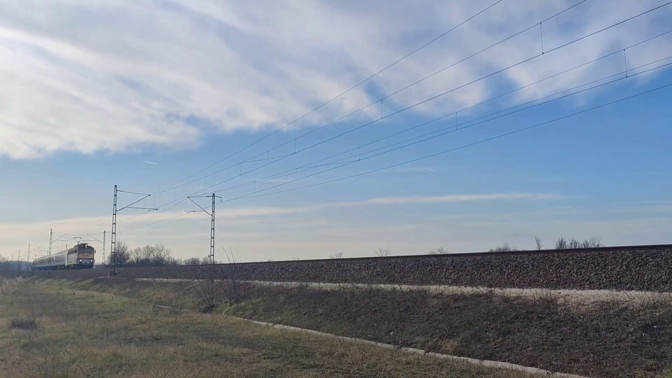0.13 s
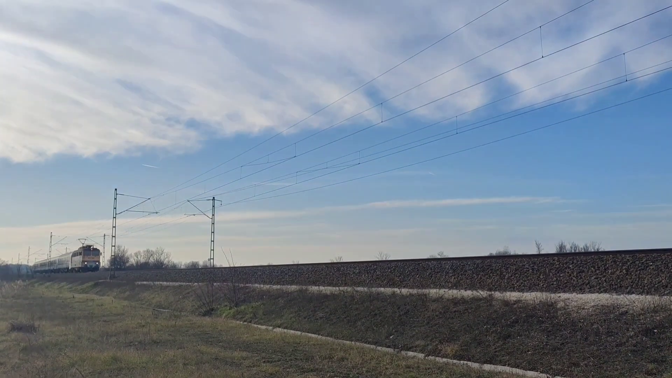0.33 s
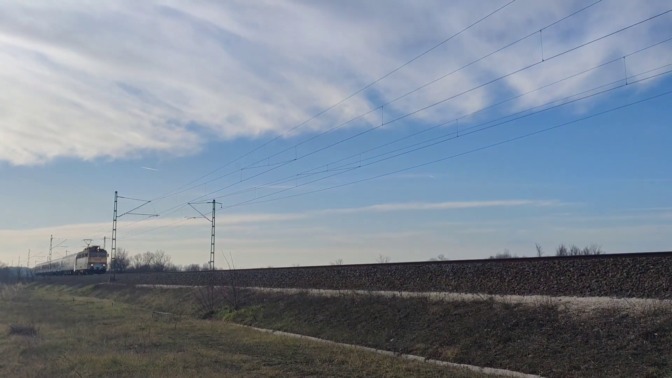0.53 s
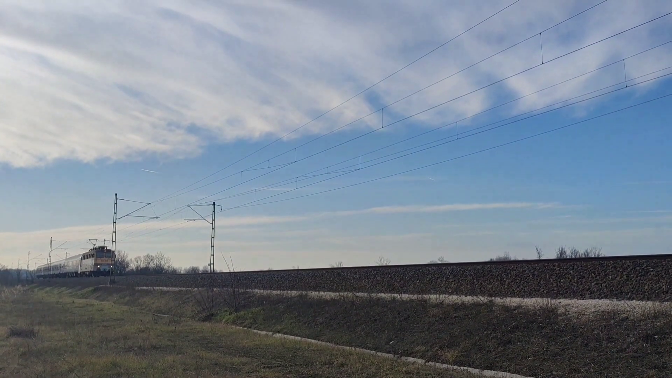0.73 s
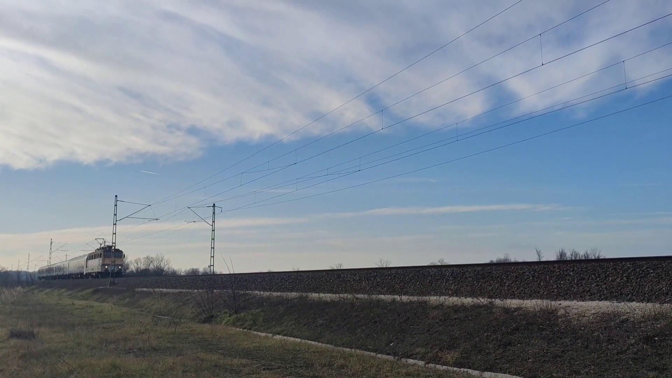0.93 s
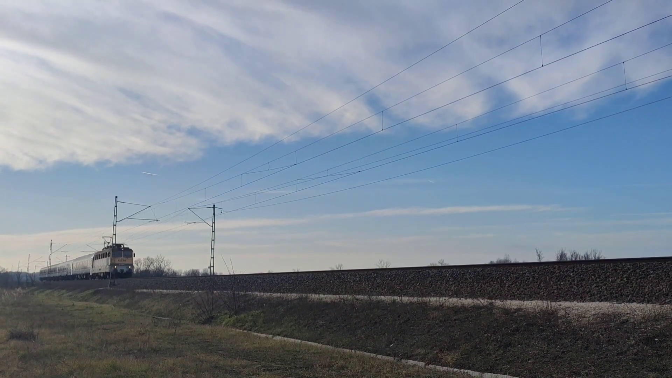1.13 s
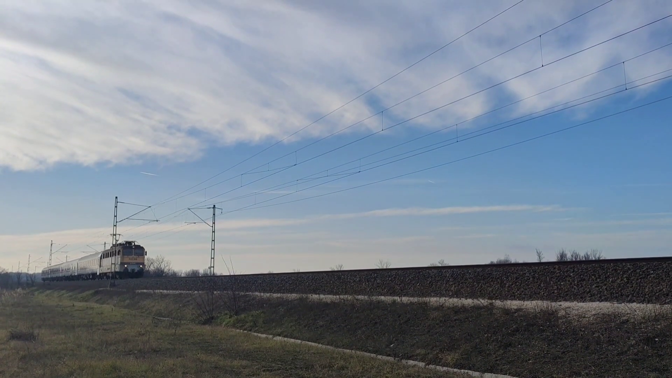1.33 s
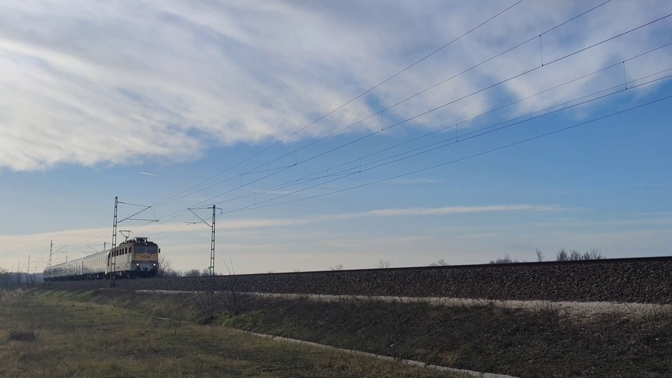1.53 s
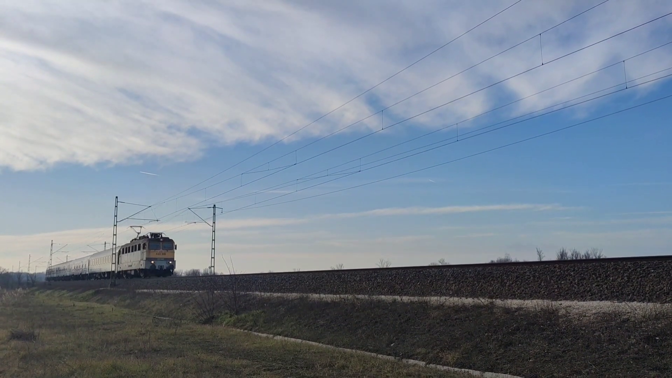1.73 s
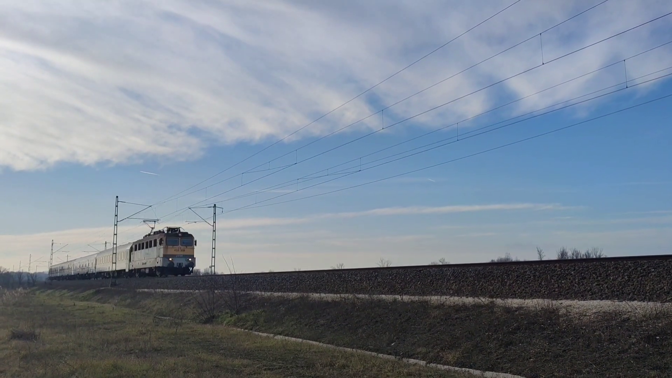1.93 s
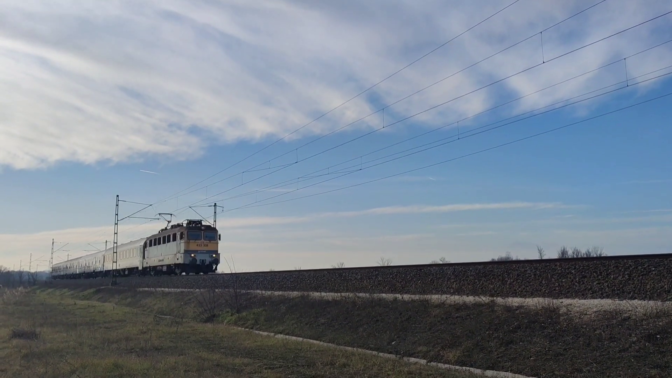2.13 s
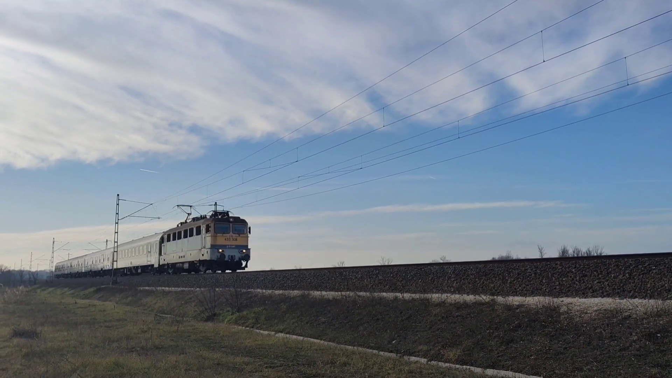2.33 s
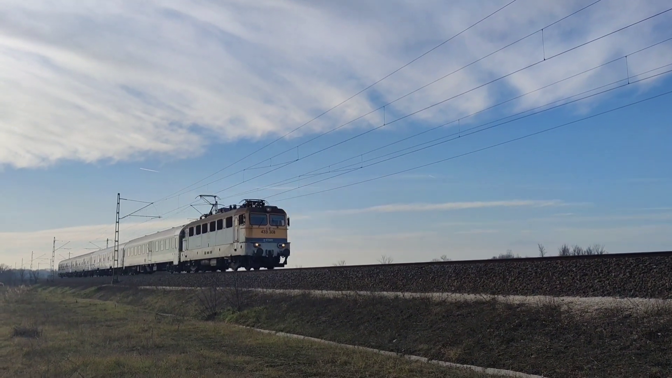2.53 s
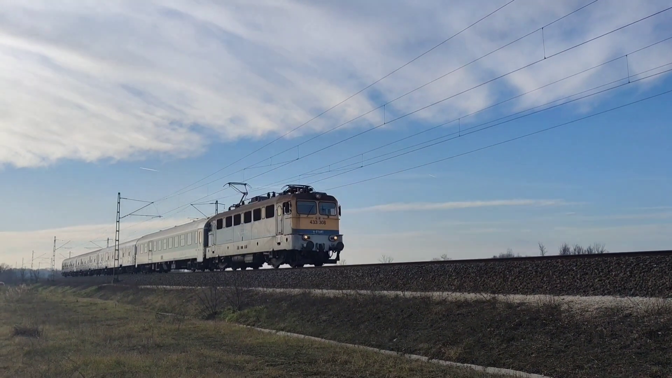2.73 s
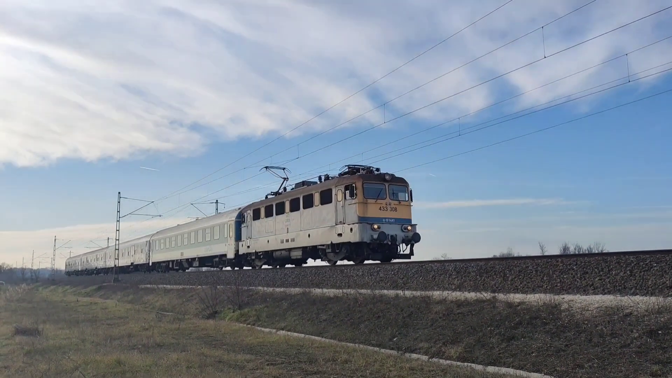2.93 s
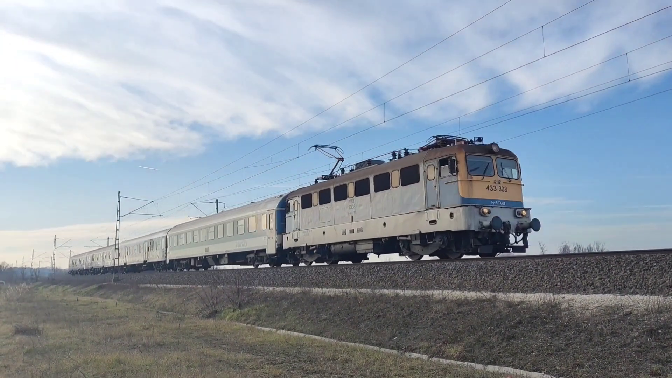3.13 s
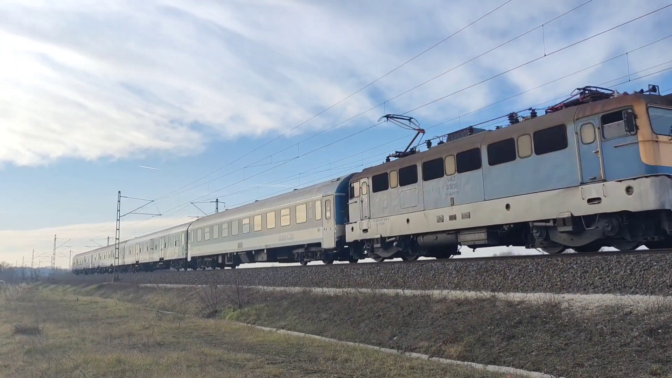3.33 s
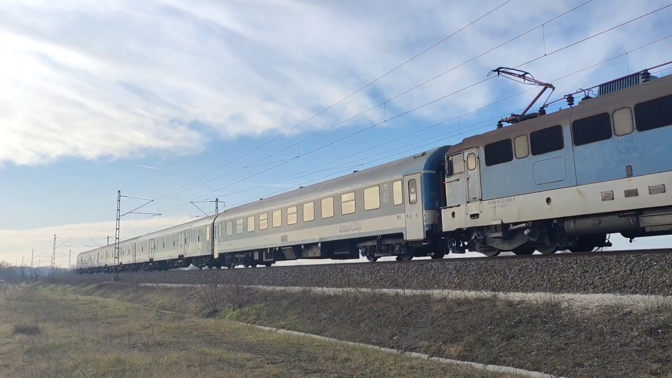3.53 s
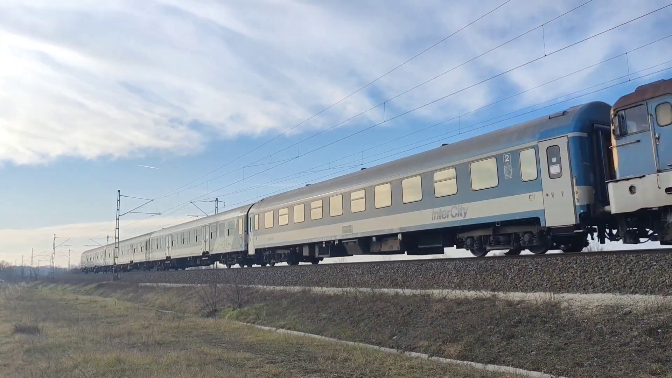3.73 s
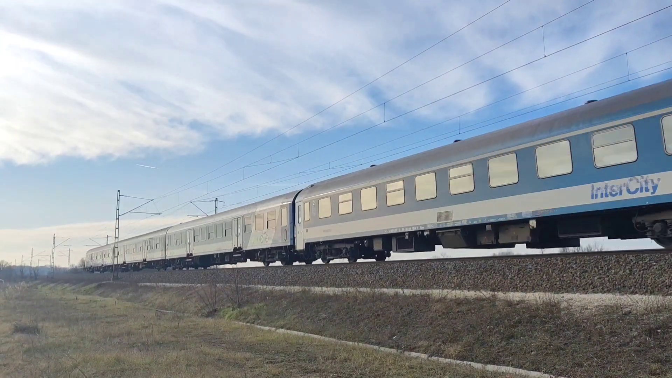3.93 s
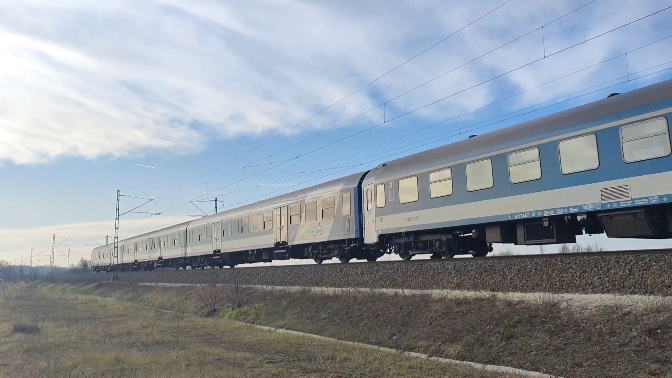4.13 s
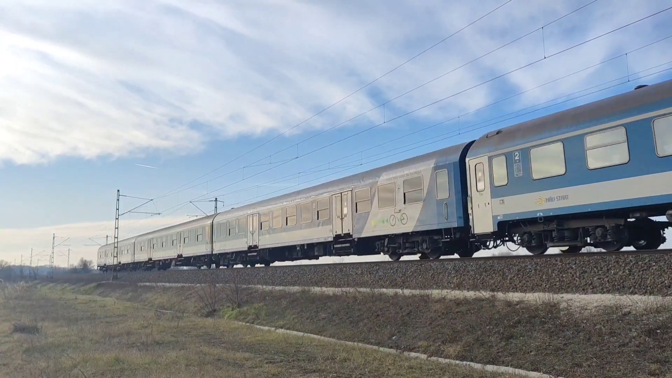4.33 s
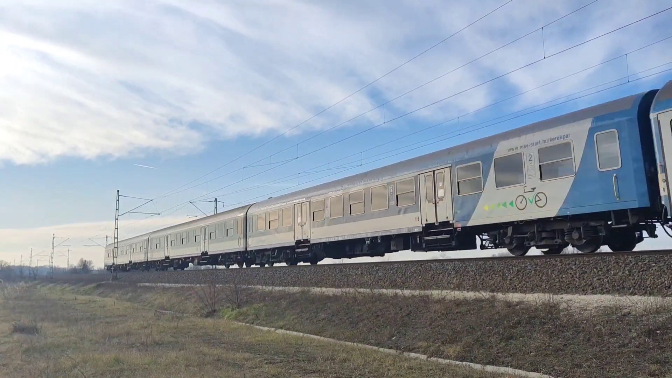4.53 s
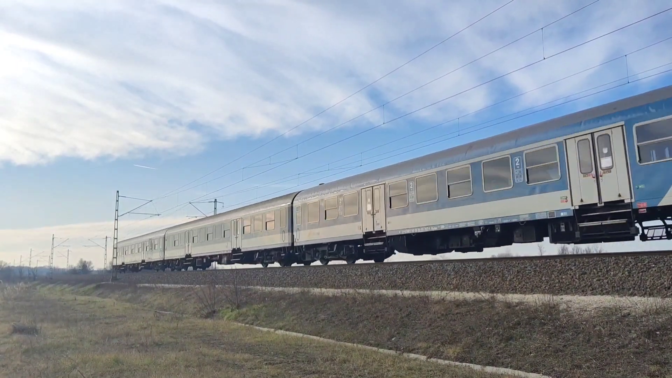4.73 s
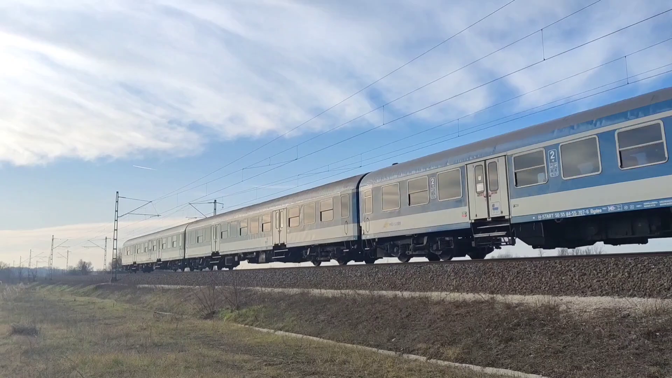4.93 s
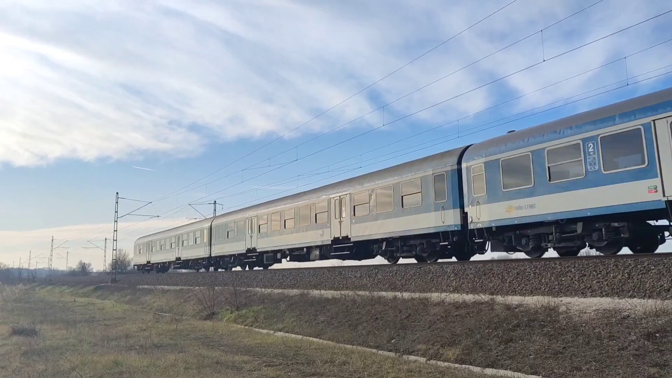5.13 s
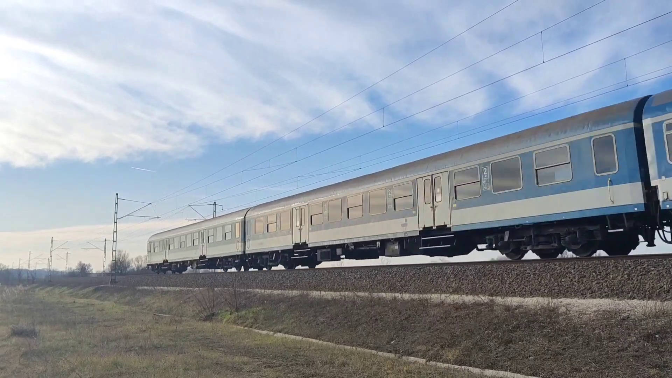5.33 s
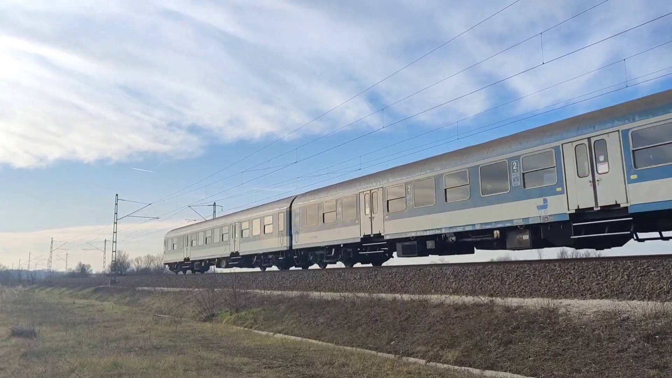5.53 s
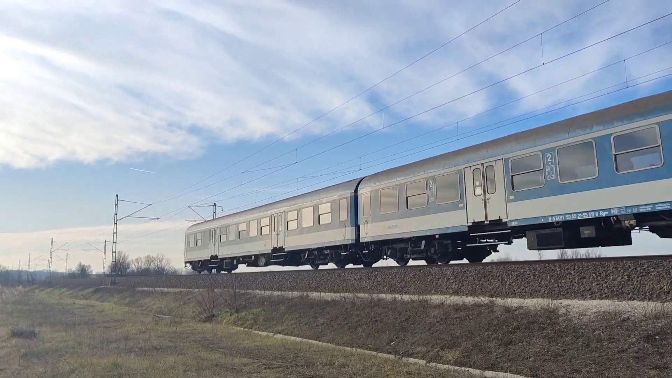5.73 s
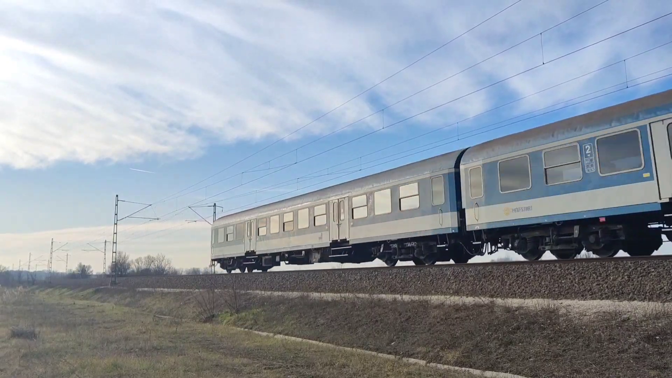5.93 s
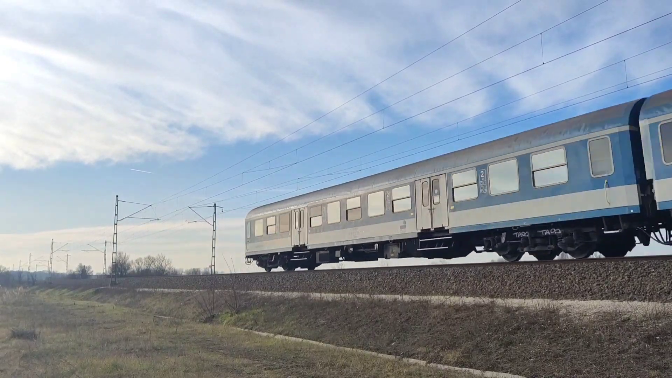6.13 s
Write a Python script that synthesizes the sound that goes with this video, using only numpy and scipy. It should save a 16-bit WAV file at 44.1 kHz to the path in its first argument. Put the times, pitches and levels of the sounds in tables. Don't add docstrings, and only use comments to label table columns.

```python
import sys
import numpy as np
from scipy import signal
from scipy.io import wavfile
from scipy.ndimage import uniform_filter1d

SR = 44100
rng = np.random.default_rng(int(sys.argv[2]) if len(sys.argv) > 2 else 0)


def ratio_of_db(decibels):
    return 10 ** (np.asarray(decibels, float) / 20)


def master_out(mix):
    frames = np.transpose(np.atleast_2d(mix))
    ceiling = np.clip(frames, -1, 1)
    pcm = np.round(ceiling * 32767).astype(np.int16)
    wavfile.write(sys.argv[1], SR, pcm)


N = 276504

FRAME, HOP = 1024, 256
HZ = np.fft.rfftfreq(FRAME, 1 / SR)
TIMES_S = np.arange(N // HOP + 2) * HOP / SR
SPEED_M_S, TRACK_M, SOUND_M_S = 32.1, 11.6, 343
MOTOR_ABREAST_S = 3.975
HANDOVER_S = 3.355

# [f/Hz, left lead/rad, likeness 0-1]
PORTS_FAR = [(40, 0, .99), (1180, .4, .7), (1320, 3, .55), (1750, .1, .93), (2200, .2, .8), (2300, 2.2, .7),
             (2880, .7, .8), (2950, 3.5, .8), (3300, 2.8, .9), (4000, -2.1, .72), (5050, -2.4, .65),
             (5700, -6.3, .78), (6150, -6.8, .3), (8000, -11, .1)]
# [f/Hz, left lead/rad, likeness 0-1]
PORTS_NEAR = [(40, 0, .995), (300, -.4, .97), (600, -1.6, .8), (900, -1.7, .72), (1250, -3.1, .8),
              (1600, -4, .82), (2000, -7.4, .55), (2250, -6.2, .68), (2700, -7.2, .6), (3000, -9.3, .4),
              (3300, -9.4, .15), (8000, -12, .1)]


def evened(x):
    return x / np.sqrt(np.mean(abs(x) ** 2))


def read(table, hz):
    f, *columns = np.transpose(table)
    return np.array([np.interp(np.log(hz + 1), np.log(f + 1), c) for c in columns])


def bell(x, centre, width):
    return np.exp(-2 * ((x - centre) / width) ** 2)


def dips_db(table):
    return sum(db * bell(HZ, hz, width_hz) for hz, width_hz, db in table)


def swells_db(table):
    return sum(np.outer(db, bell(TIMES_S, s, length_s)) for s, length_s, *db in table)


def distance_db(abreast_s, db_per_decade):
    distance_m = np.hypot(SPEED_M_S * (abreast_s - TIMES_S), TRACK_M)
    return -db_per_decade * np.log10(distance_m / TRACK_M)


def bearing_rad():
    return np.arctan2(TRACK_M, SPEED_M_S * (MOTOR_ABREAST_S - TIMES_S))


def resonate(x, hz, width_hz):
    turn = np.exp(2j * np.pi * np.cumsum(hz) / SR)
    r = np.exp(-np.pi * width_hz / SR)
    return turn * signal.lfilter([(1 - r) ** 2], [1, -2 * r, r * r], x / turn)


def roar(level, lead_rad, same, patchy_db):
    a, b, c, d, streaks = rng.standard_normal((len(TIMES_S), len(HZ), 5)).T
    for _ in range(2):
        streaks = uniform_filter1d(streaks, size=3, axis=0)
        streaks = uniform_filter1d(streaks, size=14, axis=1)
    flicker = evened(uniform_filter1d(rng.standard_normal(len(TIMES_S)), size=3))
    texture_db = patchy_db * evened(streaks) * np.minimum(HZ / 700, 1)[:, None]
    texture_db = texture_db + np.outer(0.45 + HZ / 90000, flicker)
    same = np.clip(same, 0, 1)
    right = a + 1j * b
    left = same * right * np.exp(1j * lead_rad) + np.sqrt(1 - same ** 2) * (c + 1j * d)
    return np.array([left, right]) * level * ratio_of_db(texture_db) / np.sqrt(2)


def self_noise():
    # [f/Hz, level/dB]
    hiss = [(40, -96), (4000, -101), (9000, -97), (15600, -100)]
    return roar(ratio_of_db(read(hiss, HZ).T + 0 * TIMES_S), 0, 0, .5)


def far_level_db():
    # [t/s, length/s, lift/dB]
    rough_rail = [
        (1.75, 0.26, 1.5),
        (2.15, 0.12, 2),
        (3.1, .15, 0.5),
    ]
    abreast_db, db_per_decade, fade_db_per_s = -22, 26.5, 52
    fade_db = fade_db_per_s * np.maximum(TIMES_S - HANDOVER_S, 0)
    return abreast_db + swells_db(rough_rail)[0] + distance_db(MOTOR_ABREAST_S, db_per_decade) - fade_db


def far_train():
    # [f/Hz, left/dB per Hz, right/dB per Hz]
    far_roll = [(40, -3.2, 1.5), (174, -1, -1.5), (327, -12, -11.5), (510, -22, -22.5), (750, -12.5, -12),
                (1890, -12, -13), (2780, -16, -4.5), (3240, -18.5, -13.5), (5780, -29, -16.5),
                (6280, -47, -22), (7290, -47, -32.5), (8200, -44.5, -45.5), (11500, -59, -45),
                (15600, -62, -56)]
    # [f/Hz, width/Hz, gain/dB]
    left_dips = [(570, 120, -3), (1150, 160, -6), (1560, 150, -7), (2240, 250, -13), (2910, 150, -12),
                 (3740, 380, -7), (5270, 300, -8)]
    # [f/Hz, width/Hz, gain/dB]
    right_dips = [(560, 120, -3), (1570, 210, -12), (2420, 350, -8)]
    cuts_db = np.array([dips_db(left_dips), dips_db(right_dips)])
    lead, same = read(PORTS_FAR, HZ)[:, :, None]
    bearing = bearing_rad()
    lead = lead - 5.5 * (bearing - .15) * np.minimum(HZ / 900, 1)[:, None]
    same = same * ratio_of_db(0.18 * cuts_db[0])[:, None]
    filled_db = cuts_db[:, :, None] * np.clip(1.15 - .8 * bearing, 0, 1.5)
    power = ratio_of_db(read(far_roll, HZ)[:, :, None] + filled_db + far_level_db()) ** 2
    return power, lead, same


def ground_sweep():
    # [t/s, f/Hz, level/dB]
    sweep = [
        (3.5, 378, -45),
        (3.6, 347, -27),
        (3.75, 270.4, -40),
        (4.0, 220.5, -30),
        (4.15, 203, -34.5),
        (4.25, 205, -56),
    ]
    t = np.arange(N) / SR
    s, hz, db = np.transpose(sweep)
    on = (t > s[0]) & (t < s[-1])
    band = resonate(rng.standard_normal(N), np.interp(t, s, hz), 14.0).real
    return evened(band) * ratio_of_db(np.interp(t, s, db)) * on


def coach_power():
    # [abreast/s, level/dB]
    joints = [
        (4.13, -40.5),
        (4.8, -42),
        (5.62, -26),
        (6.2, -25.5),
    ]
    # [t/s, length/s, lift/dB]
    axle_surges = [
        (5.35, 0.11, -0.5),
        (5.7, 0.1, 0.5),
        (5.81, 0.047, -1.5),
        (5.875, 0.052, 1),
        (6.05, 0.034, -0.5),
        (6.26, .05, 1.5),
    ]
    clear = np.clip((TIMES_S - 3.99) / 0.091, 0, 1)
    groups = sum(ratio_of_db(db + distance_db(s, 23)) ** 2 for s, db in joints)
    return clear * ratio_of_db(swells_db(axle_surges)[0]) ** 2 * groups


def engine_power():
    abreast_s, abreast_db, db_per_decade, emerge_db_per_s = 3.823, -28.5, 21.5, 19.5
    hidden_db = emerge_db_per_s * np.maximum(HANDOVER_S - TIMES_S, 0)
    return ratio_of_db(abreast_db + distance_db(abreast_s, db_per_decade) - hidden_db) ** 2


def engine_dips():
    # [f far off/Hz, width/Hz, gain/dB]
    ground_dips = [(540, 58, -4.5), (1560, 300, -5.5), (2350, 260, -7.5)]
    sink_per_rad, fill_per_rad = 0.12, 0.62
    bearing = bearing_rad()
    depth = np.clip(1.3 - fill_per_rad * bearing, 0, 1)
    sink = 1 - sink_per_rad * bearing
    cuts_db = sum(db * bell(HZ[:, None], hz * sink, width_hz) for hz, width_hz, db in ground_dips)
    return ratio_of_db(depth * cuts_db) ** 2


def near_train(spectrum, power):
    return power * ratio_of_db(read(spectrum, HZ)[:, :, None]) ** 2


def bogie_shelves():
    # [t/s, length/s, lift/dB]
    thumps = [
        (0.55, 0.18, 0),
        (1.05, .15, 0),
        (2.95, 0.18, 0.5),
        (3.6, 0.1, 3),
        (4.3, .25, 2.5),
        (4.85, 0.81, 2.5),
        (5.6, 0.13, -1),
    ]
    # [t/s, length/s, left/dB, right/dB]
    fizz_swells = [(.15, 0.47, 0, -0.5), (1.05, 0.31, 1, -1.5), (1.72, 0.29, 3, 2), (2.75, 0.55, 0, 4.5),
                   (3.55, 0.91, -5, -0.5), (3.82, 0.26, 0.5, 1.5), (4.2, 0.29, 3.5, 3.5),
                   (4.55, 0.31, 6, 2.5), (4.87, 0.33, 5, 5), (5.28, 0.17, 2, 1.5), (5.68, 0.24, -3.5, 2),
                   (6.3, 0.11, 4, 3)]
    rumble_db = -2 + swells_db(thumps)[0]
    fizz_db = np.array([[-2], [-0.57]]) + swells_db(fizz_swells)
    low = 1 / (1 + (HZ / 350) ** 4)
    high = HZ ** 4 / (HZ ** 4 + 4000.0 ** 4)
    shelves = ratio_of_db(low[:, None] * rumble_db + high[:, None] * fizz_db[:, None])
    return shelves * np.clip(HZ / 52, 0, 1)[:, None] ** 0.52


def rolling():
    # [f/Hz, left/dB per Hz, right/dB per Hz]
    engine_roll = [(40, 2, 3.5), (268, -3, -2.5), (517, -8, -11.5), (645, -3.5, -2.5), (950, -11.5, -9),
                   (1700, -3, -6), (2640, -14.5, -3), (2630, -9.5, -11.5), (3950, -15.5, -14),
                   (5900, -27, -11), (6810, -41, -18.5), (8250, -36, -36), (10400, -47, -34),
                   (15600, -81, -48.5)]
    # [f/Hz, left/dB per Hz, right/dB per Hz]
    coach_roll = [(40, -8, -10), (263, -17.5, -18.5), (530, -21.0, -25), (740, -13, -9.5),
                  (1070, -8.5, -12.5), (1220, -4.5, -4.5), (1770, -7, -9.5), (2380, -9.5, -3),
                  (3360, -16.5, -16), (3830, -18, -15), (5650, -21, -12.5), (7080, -37, -22.5),
                  (7740, -32.5, -34.5), (15600, -68, -46)]
    far, far_lead, far_same = far_train()
    near = near_train(engine_roll, engine_power() * engine_dips())
    near = near + near_train(coach_roll, coach_power())
    near_lead, near_same = read(PORTS_NEAR, HZ)[:, :, None]
    share = near.sum(0) / (near + far).sum(0)
    lead = np.angle((1 - share) * np.exp(1j * far_lead) + share * np.exp(1j * near_lead))
    same = (1 - share) * far_same + share * near_same
    z = roar(np.sqrt(far + near) * bogie_shelves(), lead, same, .7 + 1.2 * share)
    z += self_noise()
    z[:, HZ > 15750] = 0
    return ratio_of_db(4.5) * signal.istft(z, nperseg=FRAME, noverlap=FRAME - HOP)[1][:, :N]


def tones(table, abreast_s, flutter_hz):
    out = np.zeros((2, N))
    for hz, width_hz, left_db, right_db, start_s, end_s in table:
        span = slice(max(round(start_s * SR), 0), min(round(end_s * SR), N))
        t = np.arange(N)[span] / SR
        ahead_m = SPEED_M_S * (abreast_s - t)
        distance_m = np.hypot(ahead_m, TRACK_M)
        heard_hz = hz / (1 - SPEED_M_S * ahead_m / distance_m / SOUND_M_S)
        on = np.clip(np.minimum(t - start_s, end_s - t) / 0.095, 0, 1)
        ring = evened(resonate(rng.standard_normal(len(t)), heard_hz, width_hz))
        ring /= (abs(ring) + .05) ** .15
        ring *= on * TRACK_M / distance_m
        ring *= 1 + 0.27 * np.cos(2 * np.pi * flutter_hz * (t - 3.79))
        lead = read(PORTS_FAR if end_s < abreast_s else PORTS_NEAR, heard_hz)[0]
        pair = np.array([ratio_of_db(left_db) * ring * np.exp(1j * lead), ratio_of_db(right_db) * ring])
        out[:, span] += np.sqrt(2) * pair.real
    return out


def motor_hum():
    # [f at rest/Hz, width/Hz, left/dB, right/dB, from/s, to/s]
    hums = [(55, 12, -29, -29, 0, 4.2), (128, 22, -36, -36, 2, 4.3), (586, 20, -27.5, -27.5, 3.7, 4.75),
            (670, 240, -28, -27, 2.4, 3.75), (720, 70, -42, -41, .8, 2.6), (1270, 45, -38, -42, 0, 2.9),
            (1850, 80, -40, -37, 1, 3.2)]
    return tones(hums, MOTOR_ABREAST_S, 6.2)


def wheel_song():
    # [f at rest/Hz, width/Hz, left/dB, right/dB, from/s, to/s]
    modes = [(255, 9, -36, -36, 5.9, 6.5), (1235, 40, -25, -29, 5.42, 5.9),
             (1410, 50, -24, -32, 5.42, 5.62), (1480, 45, -22, -28, 5.98, 6.3),
             (1930, 45, -22, -22, 5.6, 5.83), (2185, 22, -23, -17, 4.5, 5.35),
             (770, 260, -30, -30, 5.0, 5.65), (2170, 110, -24, -17, 5.47, 5.8),
             (2185, 80, -17, -17, 5.8, 6.06), (2470, 90, -30, -19, 5.92, 6.3),
             (2370, 50, -18, -18, 6.15, 6.45), (2760, 40, -34, -26, 5.6, 5.82),
             (4500, 50, -48, -25, 5.28, 5.56), (4490, 50, -34, -37, 5.72, 6.45),
             (6560, 50, -54, -43, 4.55, 5.2)]
    return tones(modes, 5.8, 11.2)


def ticks():
    # [t/s, peak/dB, length/ms, right share 0-1]
    taps = [
        (0.1756, -22, 0.31, 0.21),
        (2.06, -27, 0.5, .2),
        (5.371, -13.5, 0.27, .3),
    ]
    t = np.arange(N) / SR
    out = np.zeros((2, N))
    for s, db, ms, right in taps:
        u = np.clip((t - s) * 1000 / ms, -9, 9)
        out += np.outer([1, right], ratio_of_db(db) * (1 - 0.25 * u ** 2) * np.exp(-u ** 2 / 2))
    return out


def scene():
    return rolling() + motor_hum() + wheel_song() + ground_sweep() + ticks()


def low_pass(x):
    return signal.sosfilt(signal.butter(12, 15770, fs=SR, output="sos"), x)


def record(dry):
    held = 1.618 * np.tanh(dry / 1.58)
    return low_pass(held)


dry = scene()
out = record(dry)
master_out(out)
```